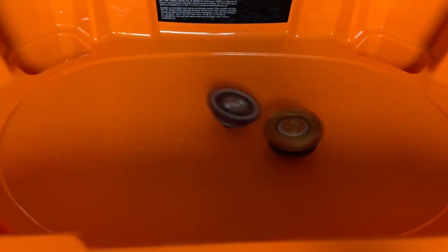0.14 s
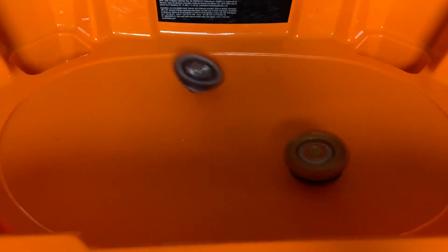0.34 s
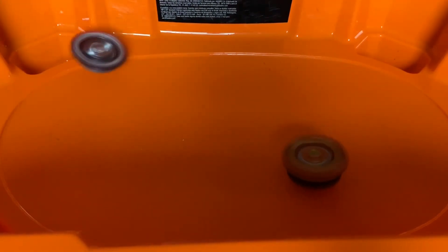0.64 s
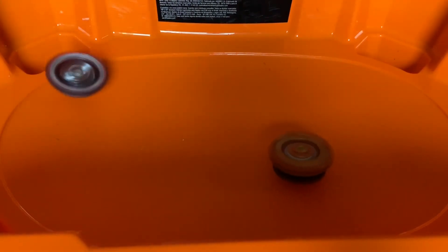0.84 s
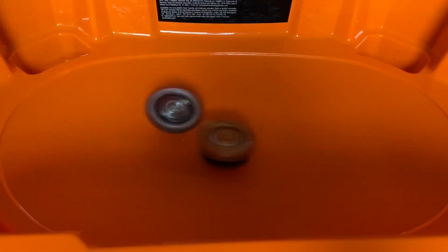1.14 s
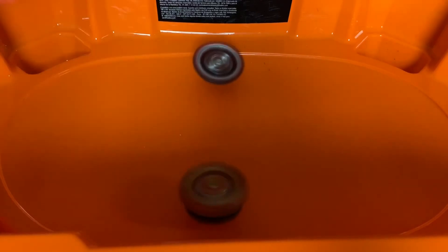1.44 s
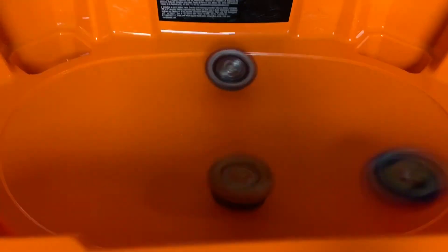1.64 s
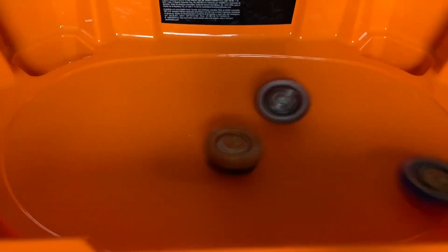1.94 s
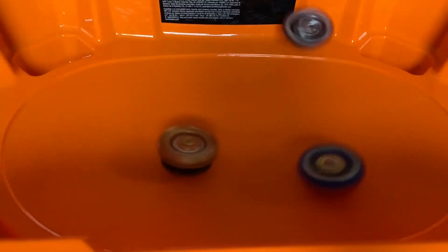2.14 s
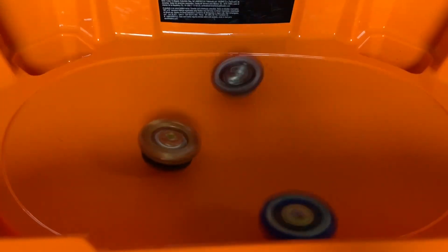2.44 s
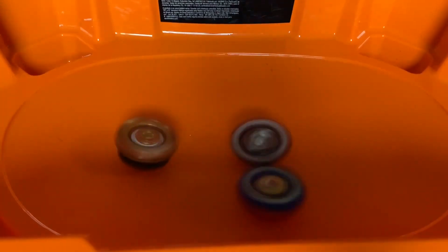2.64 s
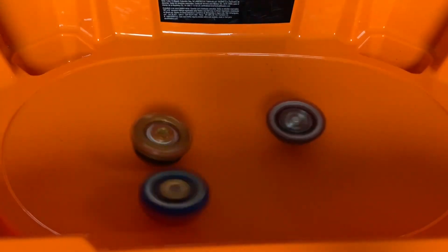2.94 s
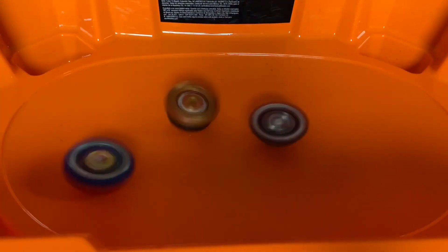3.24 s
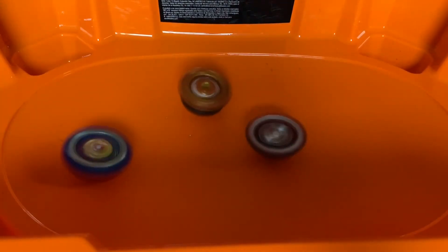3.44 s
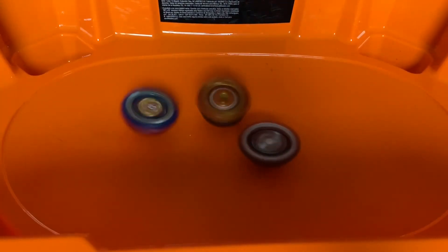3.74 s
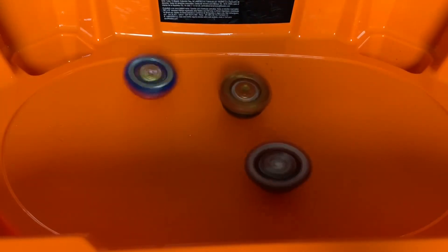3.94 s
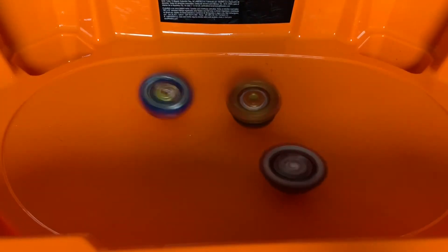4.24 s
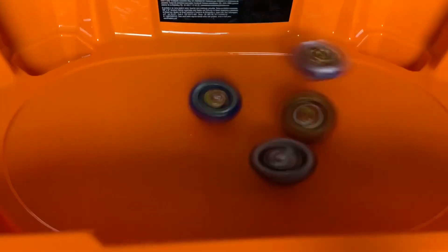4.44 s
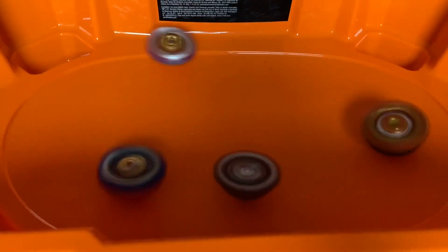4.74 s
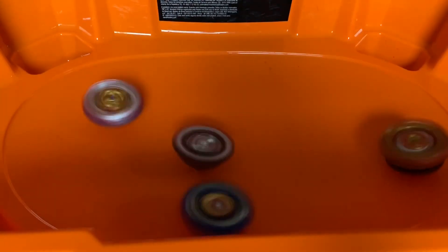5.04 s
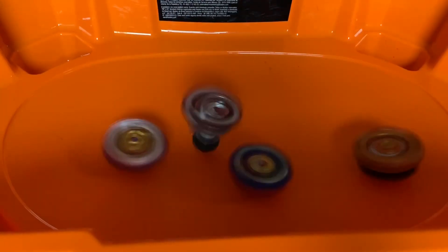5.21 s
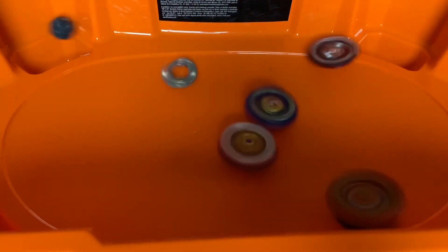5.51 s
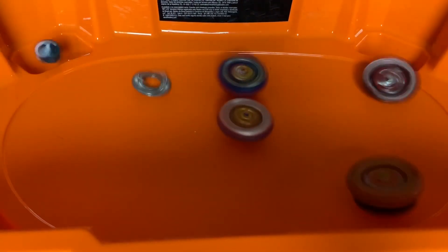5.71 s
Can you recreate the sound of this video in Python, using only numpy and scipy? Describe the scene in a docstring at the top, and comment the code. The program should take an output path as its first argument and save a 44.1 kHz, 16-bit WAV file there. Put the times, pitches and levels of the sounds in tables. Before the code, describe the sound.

Two spinning tops collide in a plastic arena with dry, bright clacks and a low rolling murmur. A zipping toothed launcher adds a third, which lands with booming overloaded thumps. After a calmer stretch of faint grazes and isolated cracks, another launcher rasps and a fourth drops in. Near the end one bursts, its pieces drumming hollowly on the floor of the bowl. Close, with short room reflections and soft air gusts.

```python
"""Spinning tops clack together in a thin plastic bowl: noise bursts through the tops' resonances.
Two more are pulled from ratchet launchers (trains of tooth snaps) and land with hollow thumps (bowl modes).
Late on one top bursts; its parts tumble as uneven knocks. Tips murmur, whirr and hum on the plastic.
A small room answers, air noise stirs at the close microphone, and the hardest hits overload it."""
import sys
import numpy as np
from scipy import signal
from scipy.fft import rfft, irfft, next_fast_len
from scipy.io import wavfile
from scipy.ndimage import uniform_filter1d

SR = 44100
rng = np.random.default_rng(int(sys.argv[2]) if len(sys.argv) > 2 else 0)


def file_out(sig):
    """Save sig as 16-bit WAV at sys.argv[1]."""
    # one column per channel
    cols = np.atleast_2d(sig).T
    # limit, then scale
    lim = np.clip(cols, -1, 1)
    pcm = np.round(lim * 32767).astype(np.int16)
    wavfile.write(sys.argv[1], SR, pcm)


N = 258886
TIME = np.arange(N) / SR


def from_db(db):
    """Decibels to gain."""
    return 10 ** (np.asarray(db) / 20)


def rms_one(x, size=None):
    """Scale so that the first `size` samples have rms 1."""
    return x / np.sqrt(np.mean(x[:size] ** 2) + 1e-20)


def at_hz(points, hz):
    """Read a spectrum on a log-frequency axis."""
    point_hz, value = np.transpose(points)
    return np.interp(np.log(np.maximum(hz, 1)), np.log(point_hz), value)


def fade(t, t60):
    """Exponential decay, 60 dB down after t60."""
    return np.exp(-np.log(1000) * t / t60)


def swell(start, end, rise_db_per_s, fall_db_per_s):
    """Gain that rises to 1 at start, holds until end and dies away."""
    before_s = np.maximum(start - TIME, 0)
    after_s = np.maximum(TIME - end, 0)
    return from_db(-rise_db_per_s * before_s - fall_db_per_s * after_s)


def uneven_times(start, end, per_s, uneven):
    """Up to 200 moments with log-normal gaps; uneven is the spread of the log gap."""
    gaps = np.exp(uneven * rng.standard_normal(200)) / per_s
    times = start + np.cumsum(gaps)
    return times[times < min(end, TIME[-1])]


def noise(spectrum, size):
    """Noise of a given colour, rms 1."""
    padded = next_fast_len(size)
    gain = from_db(at_hz(spectrum, np.fft.rfftfreq(padded, 1 / SR)))
    return rms_one(irfft(rfft(rng.standard_normal(padded)) * gain, padded)[:size])


def grains(per_s, spread_db):
    """Random tiny knocks of uneven size, rms 1."""
    sizes = from_db(spread_db * np.minimum(rng.exponential(1, N), 4))
    return rms_one((rng.random(N) < per_s / SR) * sizes * rng.standard_normal(N))


def resonate(x, hz, width):
    """One two-pole resonance that passes the same noise power at any width."""
    r = np.exp(-np.pi * width / SR)
    zeros = np.sqrt(1 - r * r) * np.array([1, 0, -1])
    poles = [1, -2 * r * np.cos(2 * np.pi * hz / SR), r * r]
    return signal.lfilter(zeros, poles, x + 1e-18)  # offset avoids denormals


def body(x, resonances, scatter_db, detune=0):
    """Parallel resonances of alternating sign, each level and pitch scattered anew per call."""
    out = 0
    for k, (hz, width, db) in enumerate(resonances):
        gain = (-1) ** k * from_db(db + scatter_db * rng.normal())
        out = out + gain * resonate(x, hz * (1 + detune * rng.uniform(-1.25, 1)), width)
    return out


def add(track, s, sound):
    """Mix a sound into a track at time s."""
    start = max(round(s * SR), 0)
    track[start:start + len(sound)] += sound[:N - start]


# air noise colour: (frequency [Hz], relative density [dB per Hz])
AIR_COLOUR = [(1, -33.5), (4, 2.5), (8, -0.5), (16, -9), (30, -26), (60, -23.5), (120, -34.5), (300, -83),
              (1000, -62)]
# an arm sweeps past and stirs the air: (time [s], peak level [dB])
ARM_GUSTS = [(0.7, -29), (1.48, -16), (2.15, -20.5), (4.33, -20)]
STILL_AIR_DB, GUST_RISE_DB_PER_S, GUST_FALL_DB_PER_S = -35, 55, 32


def draught():
    """Air drifts over the microphone as low noise and gusts when an arm passes."""
    gusts = sum(from_db(db) * swell(s, s, GUST_RISE_DB_PER_S, GUST_FALL_DB_PER_S) for s, db in ARM_GUSTS)
    return np.hypot(from_db(STILL_AIR_DB), gusts) * noise(AIR_COLOUR, N)


# room decay: (frequency [Hz], t60 [s])
ROOM_DECAY = [(150, 0.25), (600, 0.37), (2000, 0.37), (6000, 0.24), (10000, 0.22), (15000, 0.08)]
# room strength: (frequency [Hz], level [dB])
ROOM_LEVEL = [(150, -10.5), (600, -9.5), (2000, -7), (6000, -7), (10000, -6.5), (15000, -5.5)]


def room(x, first_echo_s=0.01, size=20000):
    """Near walls answer after a short gap with dense echoes, each band dying at its own rate."""
    t, response = TIME[:size], np.zeros(size)
    edges = np.geomspace(100, 17000, 11)
    for low, high in zip(edges, edges[1:]):
        hz = np.sqrt(low * high)
        gap = 1 / (1 + (first_echo_s / (t + 1e-6)) ** 8)
        envelope = fade(t, at_hz(ROOM_DECAY, hz)) * gap
        band = signal.butter(2, [low, high], "band", fs=SR, output="sos")
        echoes = signal.sosfilt(band, rng.standard_normal(size))
        response += from_db(at_hz(ROOM_LEVEL, hz)) * echoes * envelope / np.linalg.norm(envelope)
    return signal.fftconvolve(x, response)[:N]


# a top skids on its side: (start [s], end [s], level [dB])
SIDE_SKIDS = [(1.03, 1.1, -53), (1.64, 1.72, -31), (2.25, 2.46, -31.5), (2.9, 3.22, -49.5),
              (3.3, 3.46, -34), (3.92, 4.03, -46), (4.45, 4.52, -29), (5.33, 5.52, -28)]
SKID_RISE_DB_PER_S, SKID_FALL_DB_PER_S = 200, 130
# wobble level is for a 0 dB clack
UPRIGHT_DB, WOBBLE_DB, WOBBLE_T60_S = -66, -27, 0.5


def unsteadiness(hits):
    """Whirr strength: a little when upright, more in a skid and after a clack, settling again."""
    wobble = np.zeros(N)
    settling = fade(TIME[:SR], WOBBLE_T60_S)
    for s, db, _ in hits:
        start = round(s * SR)
        after = slice(start, start + SR)
        wobble[after] = np.maximum(wobble[after], from_db(db + WOBBLE_DB) * settling[:len(wobble[after])])
    skid_power = sum((from_db(db) * swell(start, end, SKID_RISE_DB_PER_S, SKID_FALL_DB_PER_S)) ** 2
                     for start, end, db in SIDE_SKIDS)
    return np.sqrt(from_db(UPRIGHT_DB) ** 2 + wobble ** 2 + skid_power)


# how hard the tips run on the bowl, before the cap: (time [s], level [dB])
TIP_RUNNING = [(0.0, -36), (0.5, -34), (0.7, -51), (1.03, -51), (1.31, -37), (1.54, -37), (1.75, -21),
               (2.11, -24), (2.3, -33), (2.57, -35), (2.74, -47), (3.82, -48), (4.27, -44), (4.48, -29),
               (4.77, -40), (5.15, -40), (5.49, -18), (5.87, -22)]
# whirr of tips and loose rings: (frequency [Hz], relative density [dB per Hz])
WHIRR_COLOUR = [(1000, -7.5), (2000, -2.5), (2800, -3.5), (3700, -4), (5000, 1.5), (7000, 1.5), (9500, -4),
                (13000, -12.5), (16000, -23)]
# modes of the bowl: (frequency [Hz], level [dB], free t60 [s])
BOWL_MODES = [(135.3, -8, 0.2), (162.3, -3.5, 0.51), (216.6, -5, 0.36), (286.9, -3, 0.27),
              (355.8, -2, 0.17), (380.4, -2.5, .2), (443.2, -3, 0.13), (517, 0.5, 0.081),
              (600, -0.5, 0.099), (680.4, 4, 0.086), (848, 0.5, 0.066), (939.6, 1.5, 0.095),
              (1033, 1, 0.12), (1174, 4, 0.076), (1383, -7, 0.45), (1657, -20.5, 0.049), (1936, -24, 0.13),
              (2120, -5.5, 0.29), (2240, -4.5, 0.12)]
ROLLING_CAP_DB = -29
# harder rolling sounds deeper: depth is 1 at FULL_ROLL_DB, its dB grow by DEPTH_GROWTH per dB
FULL_ROLL_DB, DEPTH_GROWTH = -34, 0.22


def running(hits, tip_hiss_db=-27):
    """Tip bumps keep the bowl modes murmuring; rattling loose rings make the whirr flutter."""
    rolling = from_db(np.minimum(np.interp(TIME, *np.transpose(TIP_RUNNING)), ROLLING_CAP_DB))
    bumps = grains(per_s=1200, spread_db=4.0)
    modes = np.zeros(N)
    for k, (hz, db, t60) in enumerate(BOWL_MODES):
        gain = (-1) ** k * from_db(db - 4.5 * np.log2(hz / 500))
        modes += gain * resonate(bumps, hz, 4.8 / t60)  # wider than the free mode
    depth = (rolling / from_db(FULL_ROLL_DB)) ** DEPTH_GROWTH
    upper = rms_one(resonate(resonate(bumps, 900, 600), 1000, 1600))
    rumble = depth * rms_one(modes) + 0.45 / depth * upper

    knocks = np.abs(grains(per_s=430, spread_db=3.5))
    rattle = rms_one(signal.lfilter([1], [1, -np.exp(-1 / (0.0027 * SR))], knocks))  # 2.7 ms decay
    whirr = rms_one(noise(WHIRR_COLOUR, N) * (1 + 0.95 * rattle))
    whirr_level = np.hypot(unsteadiness(hits), from_db(tip_hiss_db) * rolling)
    return rolling * rumble + whirr_level * whirr


# gliding hums, mostly a tip speeding up or slowing; the 1.09 s row is a low bowl mode humming: (start [s], end
# [s], start pitch [Hz], end pitch [Hz], level [dB])
TIP_GLIDES = [(0.02, 0.562, 151, 185, -39), (.18, 0.333, 446, 600, -40), (.22, 0.339, 641, 820, -41),
              (0.297, 0.517, 251, 340, -43), (.96, 1.098, 764, 850, -52), (1.09, 1.33, 158, 175, -34),
              (2.6, 2.806, 186, 215, -40.5), (4.46, 4.716, 187, 225, -36), (4.647, 4.804, 3220, 3050, -51),
              (4.756, 4.92, 385, 440, -45), (4.924, 5.08, 2660, 2960, -50)]


def glides(width_share, flutter_db=4.0):
    """A rolling tip, or once a low bowl mode, sings a rough, fluttering tone of gliding pitch."""
    out = np.zeros(N)
    for start, end, start_hz, end_hz, db in TIP_GLIDES:
        size = max(round((end - start) * SR), 64)
        smooth = signal.butter(2, width_share * start_hz / 2, fs=SR, output="sos")
        raw = rng.standard_normal(size + 8000) + 1j * rng.standard_normal(size + 8000)
        waver = signal.sosfilt(smooth, raw)[-size:]  # filter settled
        phase = 2 * np.pi * np.cumsum(np.geomspace(start_hz, end_hz, size)) / SR
        flutter = from_db(flutter_db * noise([(10, -20), (30, 0), (70, 0), (300, -60)], size))
        tone = rms_one(flutter * np.real(waver * np.exp(1j * phase)))
        add(out, start, from_db(db) * tone * signal.windows.tukey(size, 0.5))
    return out


# a panel or loose part rings when struck: (time [s], level [dB], pitch [Hz], t60 [s])
PART_PINGS = [(0.125, -20.5, 657, 0.083), (2.11, -3, 686, 0.15), (2.591, -23, 708, .1),
              (5.252, -37, 15200, .3), (5.27, -28, 9600, 0.21), (5.465, -16, 2930, 0.04),
              (5.611, -16, 3040, 0.034), (5.742, -14, 1155, 0.037)]


def pings(size=14000):
    """A panel or small part rings on two close modes."""
    out, t = np.zeros(N), TIME[:size]
    for s, db, hz, t60 in PART_PINGS:
        lower_hz = hz * rng.uniform(0.93, 0.98)
        pair = np.sin(2 * np.pi * hz * t) + 0.7 * np.sin(2 * np.pi * lower_hz * t)
        add(out, s, from_db(db) * pair * fade(t, t60))
    return out


def bowl_ring(centre_hz, octaves, flutter, flutter_t60, size=12000):
    """A blow wakes the bowl's modes near one pitch, plus a crowd of short-lived wall modes."""
    t = TIME[:size]
    hz, db, t60 = np.transpose(BOWL_MODES)[:, :, None]
    reach = 1 / (1 + (np.log2(hz / centre_hz) / octaves) ** 2)
    strength = rng.choice([-1, 1], hz.shape) * rng.uniform(0.85, 1, hz.shape)
    tones = np.sin(np.float32(2 * np.pi * hz * t)) * fade(t, t60)
    modes = np.sum(strength * reach * from_db(db) * tones, axis=0)
    burst = rng.standard_normal(size) * fade(t, flutter_t60)
    walls = resonate(resonate(burst, centre_hz, centre_hz * octaves), centre_hz, 2 * centre_hz)
    return rms_one(rms_one(modes, size=530) + flutter * rms_one(walls, size=530), size=530)


# tops and parts land on the bowl:
# (time [s], level [dB], struck panel pitch [Hz], boom share [dB], crack share [dB])
LANDINGS = [(0.518, -16.5, 1050, -10, -8), (1.571, 0, 520, -7, -35), (1.712, 7.5, 900, -16, -9),
            (1.7799, -9, 456, -1, -10), (1.8198, 2, 700, -16, -6), (2.0667, -12, 430, -12, -12),
            (2.1084, 2, 780, -21, -3), (2.2084, -15, 764, -4, -1), (2.2607, -22, 563, -5, -5),
            (2.286, -19, 330, -25, -12), (4.2963, -4.5, 700, -4, -13), (4.4434, -17, 610, 3, 2),
            (5.1184, -22, 317, -15, -7), (5.266, -19, 840, -4, -16), (5.3113, -9, 342, -3, -10),
            (5.3222, -15, 320, 2, -9), (5.3794, -13, 800, -9, -14), (5.3894, -10, 680, -6, -20),
            (5.4148, -12, 450, -4, -10), (5.4623, -11, 665, -10, -10), (5.493, -13, 384, -5, -20),
            (5.5522, -12, 497, -14, -26), (5.6116, -14, 600, -25, -6), (5.6792, -19, 427, -12, -14),
            (5.7422, -12, 864, -17, -20)]
# crack of plastic: (frequency [Hz], relative density [dB per Hz])
CRACK_COLOUR = [(500, -7.5), (1300, 2), (2500, -1), (4000, -12.5), (7000, -9.5), (11000, -22), (16000, -27)]


def thumps(landings, size=12000):
    """A landing cracks, rings the panel it strikes and sets the whole bowl booming."""
    out, t = np.zeros(N), TIME[:size]
    for s, db, panel_hz, boom_db, crack_db in landings:
        panel = bowl_ring(panel_hz, octaves=0.4, flutter=1.0, flutter_t60=0.058)
        boom = bowl_ring(centre_hz=223, octaves=1.0, flutter=0.42, flutter_t60=0.091)
        crack = rms_one(noise(CRACK_COLOUR, size) * fade(t, 0.051), size=300)
        # after a light landing the top stays on the panel and damps it
        damping = fade(t, 0.68 * from_db(0.45 * db))
        blow = 0.88 * panel + from_db(boom_db) * boom + from_db(crack_db) * crack
        add(out, s, from_db(db) * damping * blow)
    return out


# broken parts tumble: (start [s], liveliest from [s], liveliest until [s], level [dB])
PARTS_TUMBLE = (5.31, 5.4, 5.52, -19)
# floor panel under a part: (frequency [Hz], width [Hz], level [dB])
FLOOR_RESONANCES = [(334, 85, 1.5), (494, 105, -4), (720, 140, -1), (983, 170, -0.5), (1155, 160, -9)]
TUMBLE_RISE_DB_PER_S, TUMBLE_FALL_DB_PER_S = 90, 32


def tumble(knocks_per_s=80, flops_per_s=25, flop_db=0, flop_boom_db=-4, flop_crack_db=-14):
    """Parts roll over their corners and drum the floor unevenly; some flop onto other panels."""
    start, lively_from, lively_until, db = PARTS_TUMBLE
    vigour = swell(lively_from, lively_until, TUMBLE_RISE_DB_PER_S, TUMBLE_FALL_DB_PER_S)
    vigour_db = db + 20 * np.log10(vigour)

    at = (uneven_times(start, TIME[-1], knocks_per_s, uneven=0.45) * SR).astype(int)
    strengths = from_db(rng.normal(0, 1.5, 200)) * rng.choice([-1, 1], 200)
    knocks = np.zeros(N)
    knocks[at] = strengths[:len(at)]
    drumming = body(knocks, FLOOR_RESONANCES, scatter_db=1.0)
    drumming = drumming / np.std(drumming[at[0]:])

    panels_hz = rng.uniform(350, 750, 200)
    flop_times = uneven_times(start, TIME[-1], flops_per_s, uneven=0.45)
    flops = [(s, np.interp(s, TIME, vigour_db) + flop_db, hz, flop_boom_db, flop_crack_db)
             for s, hz in zip(flop_times, panels_hz)]
    return from_db(vigour_db) * drumming + thumps(flops)


# launcher pulls: (start [s], last yank [s], yank length [s], level reached before the yank [dB],
# exponent of the swell, top speed [teeth per s])
PULL_1 = (1.371, 1.466, 0.01, -14, 0.55, 2900)
PULL_2 = (4.045, 4.146, 0.02, -15, 1.15, 2520)
# launcher housings: (frequency [Hz], width [Hz], level [dB])
HOUSING_1 = [(1356, 1300, -9.5), (3005, 200, -7.5), (4450, 1500, -2.5), (5570, 700, 1), (6780, 700, -2.5),
             (9300, 1100, -6.5), (11560, 3100, -5)]
HOUSING_2 = [(1600, 900, -15), (2350, 300, -11), (2620, 160, -6.5), (4250, 400, -4), (5200, 500, 0),
             (6800, 1500, -1), (9000, 1600, -2), (11800, 2500, -3)]
START_TEETH_PER_S, YANK_DB = 450, 11
COAST_DB, COAST_FALL_DB_PER_S = -14, 160  # ratchet freewheels once the cord is out
FORCE_SMOOTHING_S = 0.008


def launcher(pull, housing, jitter, rasp, judder_db):
    """A cord speeds up a ratchet, yanks and lets it coast; every tooth snaps against the housing."""
    start, yank, yank_s, db, exponent, top_teeth_per_s = pull
    drawn = np.clip((TIME - start) / (yank - start), 0, 1)
    coasted_s = np.maximum(TIME - yank - yank_s, 0)
    coast = from_db(COAST_DB - COAST_FALL_DB_PER_S * coasted_s)
    force = np.select([TIME < yank, coasted_s == 0], [drawn ** exponent, from_db(YANK_DB)], coast)
    force = uniform_filter1d(force, round(FORCE_SMOOTHING_S * SR))

    teeth_per_s = START_TEETH_PER_S + (top_teeth_per_s - START_TEETH_PER_S) * drawn
    turn = np.cumsum(teeth_per_s * (1 + jitter * rng.standard_normal(N))) / SR  # in teeth
    snaps = np.diff(np.floor(turn), prepend=0) * from_db(rng.normal(0, 7.7, N))
    scrape = rng.standard_normal(N) * (1 - turn % 1) ** 2  # fades from tooth to tooth
    jerks = from_db(judder_db * noise([(200, 0), (600, -40), (2000, -90)], N))
    drive = jerks * (rms_one(snaps) + rasp * rms_one(scrape))
    return rms_one(body(drive, housing, scatter_db=2.1)) * from_db(db) * force


# while the tops lean: (start [s], end [s])
LEANING = (2.2, 3.3)
GRAZES_PER_S, GRAZE_DB, GRAZE_SCATTER_DB = 24, -40.5, 2.5


def grazes():
    """Faint random rim touches on the bowl: (time [s], level [dB], brightness [dB per octave])."""
    times = uneven_times(*LEANING, GRAZES_PER_S, uneven=0.45)
    chance = rng.standard_normal((200, 2))
    return [(s, GRAZE_DB + GRAZE_SCATTER_DB * force, -5 + 1.5 * bite)
            for s, (force, bite) in zip(times, chance)]


# top against top: (time [s], level [dB], brightness [dB per octave])
TOP_CLACKS = [(0.019, -14.5, -6), (0.0234, -15, -7), (0.0424, -24, -6), (0.1175, -17.5, -2),
              (0.1239, -8.5, -1), (0.3078, -22, -6), (0.362, -18.5, -5), (0.3674, -19.5, -6),
              (0.3758, -31, -2), (0.4274, -30, -4), (0.4408, -26, -6), (0.4668, -23, -5), (0.486, -37, -1),
              (0.5583, -21.5, -5), (0.5856, -4.5, -4), (0.5984, -8, -1), (0.605, -8.5, -4), (0.614, -9, -2),
              (0.6195, -5.5, 0), (0.6262, -7, -4), (0.6318, -2, -6), (0.6394, -6, -6), (0.6475, -8, -4),
              (0.6574, -9, -6), (0.6672, -13, -1), (0.7482, -29.5, -1), (0.8705, -46, -4), (1.1073, -1, 2),
              (1.1222, -13, 4), (1.3288, -35, -5), (1.7805, -12, 0), (1.82, -7.5, -6), (1.827, -13, -6),
              (1.8551, -4, 2), (1.858, -2.5, 4), (1.997, -2.5, 4), (1.9988, -3, 2), (2.011, -10, -3),
              (2.028, -11, -1), (2.0344, -10, -3), (2.0973, -9.5, -1), (2.1838, -25, 3), (2.2085, -23, -5),
              (2.5033, -6, 4), (2.5876, -25, 2), (2.5898, -8.5, 3), (2.5978, -16, 1), (2.9298, -33, 0),
              (3.0728, -38, 3), (3.2302, -31, -6), (3.246, -33, -6), (3.2839, -22, -3), (3.3255, -22, -3),
              (3.3551, -14.5, -3), (3.3867, -13.5, -3), (3.4213, -13.5, 0), (3.4689, -14, 3),
              (3.772, -5.5, 1.5), (3.9448, -36, -4), (4.0159, -37, -1), (4.2979, -11, -2), (4.3116, -9, 4),
              (4.3288, -14, 3), (4.334, -5.5, 3), (4.4441, -4.5, -3), (4.445, -1.5, 3), (5.0753, -4, 3),
              (5.0766, -2, 1), (5.1186, -14.5, 4), (5.238, -24, 3), (5.2528, -22, 1), (5.269, -16, 3),
              (5.3212, -16, 0), (5.337, -6, 1), (5.3621, -9.5, 1), (5.385, -5, -1), (5.4154, -13, 3),
              (5.6114, -21, 1), (5.6653, -27, 0), (5.705, -26, -2), (5.7189, -7.5, 4), (5.7239, -3, 4)]
# resonances of the tops: (frequency [Hz], width [Hz], level [dB])
TOP_RESONANCES = [(2655, 730, -8), (3510, 990, -8.5), (4660, 700, -2.5), (5640, 660, 1.5), (6430, 590, 4),
                  (7430, 740, 1.5), (8600, 900, 0.5), (9640, 2000, -2), (11460, 2200, -4.5),
                  (14900, 2200, -9)]
# click scattered between the bowl's walls: (frequency [Hz], relative density [dB per Hz])
WASH_COLOUR = [(700, -15), (1500, -17), (2600, -0.5), (3700, -4), (5500, 2.5), (8000, 0), (12000, -6.5),
               (16000, -15)]
# a deeper bite is brighter and longer: contact time at brightness 0, log growth per dB per octave
CONTACT_S, CONTACT_GROWTH = 0.003, 0.085
CLACK_JOLT_DB, GRAZE_JOLT_DB = -20, -7  # share passed into the bowl


def clacks(hits, jolt_db, low_cut_hz=1300, wash_db=-19, wash_t60=0.14, spread_db=19, size=4096):
    """Rims grind for a few ms and jolt the bowl. Returns (straight sound, sound sent round the room)."""
    straight, spread, jolts, t = np.zeros(N), np.zeros(N), np.zeros(N), TIME[:size]
    hz = np.fft.rfftfreq(size, 1 / SR)
    high_pass = signal.butter(2, low_cut_hz, "high", fs=SR, output="sos")
    for s, db, tilt in hits:
        slope_db = tilt * np.log2(np.clip(hz, 2000, 16000) / 6000)
        push = np.exp(CONTACT_GROWTH * tilt)  # a longer contact carries more energy
        grind = irfft(rfft(rng.standard_normal(size)) * from_db(slope_db), size)
        contact = grind * np.exp(-(t / (CONTACT_S * push)) ** 1.42)
        click = signal.sosfilt(high_pass, body(contact, TOP_RESONANCES, scatter_db=2.0, detune=0.085))
        wash = from_db(wash_db) * push * noise(WASH_COLOUR, size) * fade(t, wash_t60)
        add(straight, s, from_db(db) * (rms_one(click, size=176) + wash))

        # summed over all directions the click has a smooth spectrum
        snap = np.roll(irfft(from_db(at_hz(WASH_COLOUR, hz) + 0.5 * slope_db), size), 32)
        add(spread, s, from_db(db + spread_db) * push * snap / np.linalg.norm(snap))

        jolt = bowl_ring(centre_hz=1050, octaves=0.9, flutter=1.6, flutter_t60=0.091, size=6000)
        add(jolts, s, from_db(db + jolt_db) * push * jolt)
    return np.array([straight + jolts, spread + jolts])


def scene():
    """Bowl and launchers in the room, with air stirring at the microphone."""
    air = draught()
    others = running(TOP_CLACKS) + glides(width_share=0.15) + pings()
    others += thumps(LANDINGS) + tumble()
    others += launcher(PULL_1, HOUSING_1, jitter=0.79, rasp=0.96, judder_db=1.3)
    others += launcher(PULL_2, HOUSING_2, jitter=0.82, rasp=1.9, judder_db=1.0)
    straight, spread = clacks(grazes(), GRAZE_JOLT_DB) + clacks(TOP_CLACKS, CLACK_JOLT_DB)
    return (straight + others + room(spread + others) + air)[None]


CUTOFF_HZ = 16000


def record(dry):
    """The input stage flattens the loudest peaks, then a steep low-pass cuts the top."""
    clipped = dry / (1 + dry ** 6) ** (1 / 6)
    low_pass = signal.ellip(12, 0.1, 95, CUTOFF_HZ, fs=SR, output="sos")
    return signal.sosfilt(low_pass, clipped)


dry = scene()
out = record(dry)
file_out(out)
```